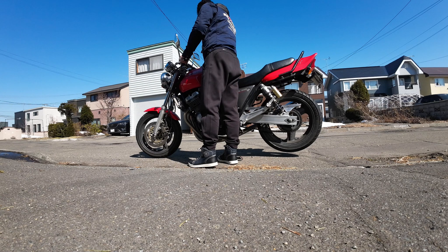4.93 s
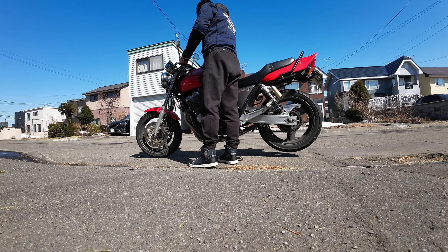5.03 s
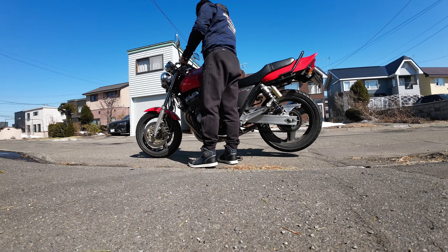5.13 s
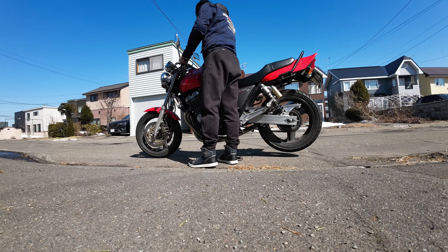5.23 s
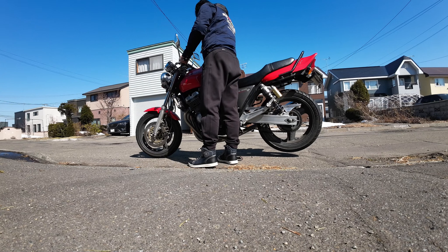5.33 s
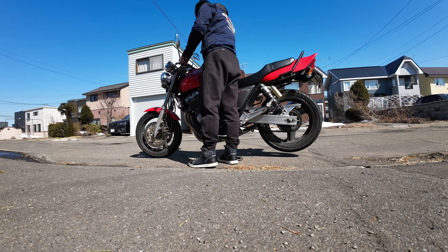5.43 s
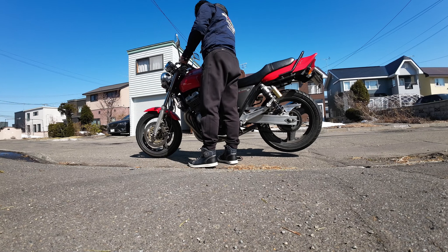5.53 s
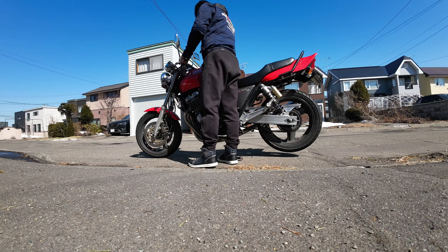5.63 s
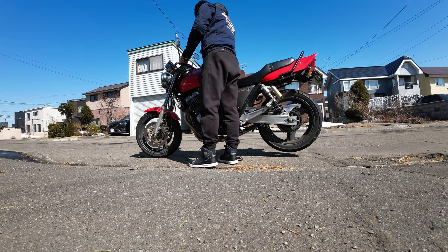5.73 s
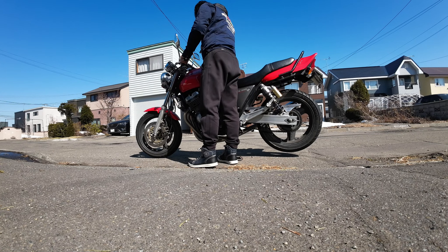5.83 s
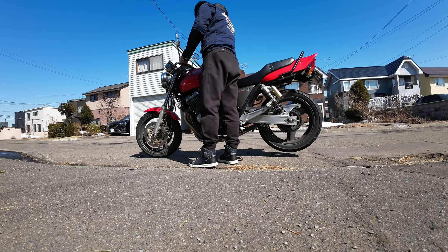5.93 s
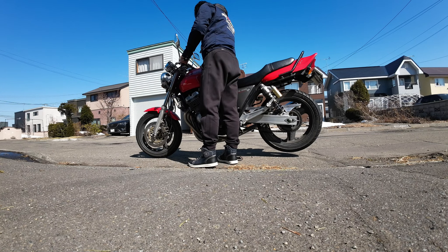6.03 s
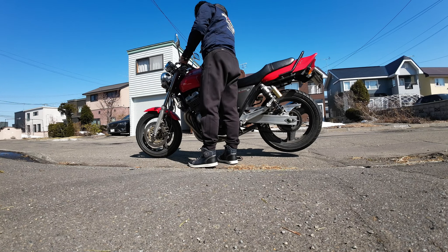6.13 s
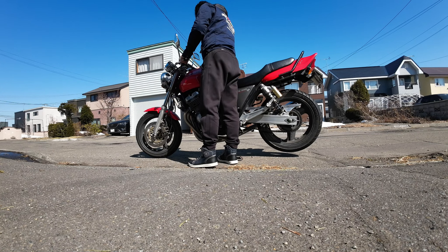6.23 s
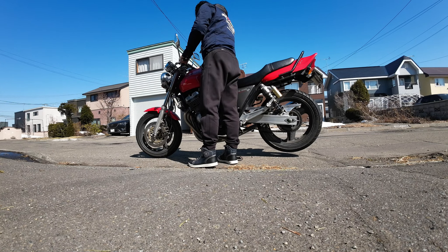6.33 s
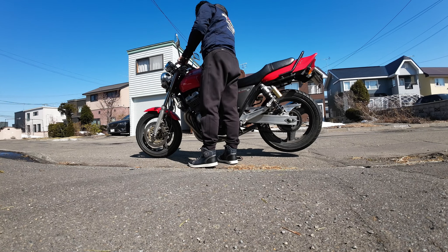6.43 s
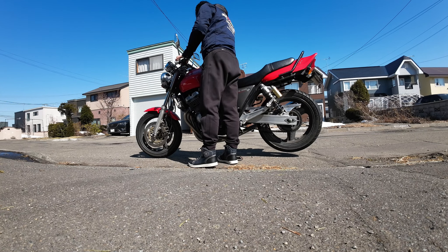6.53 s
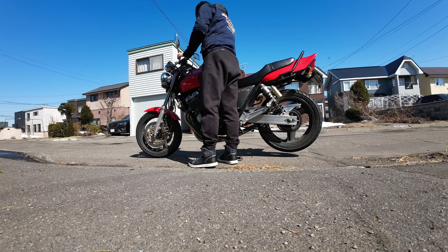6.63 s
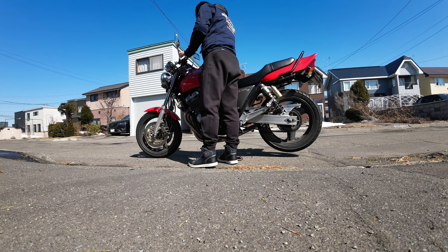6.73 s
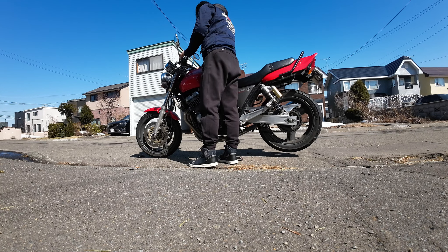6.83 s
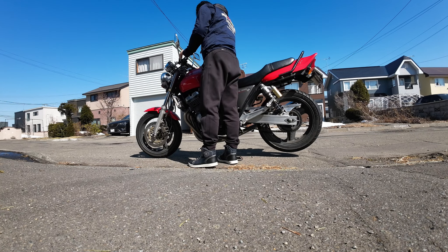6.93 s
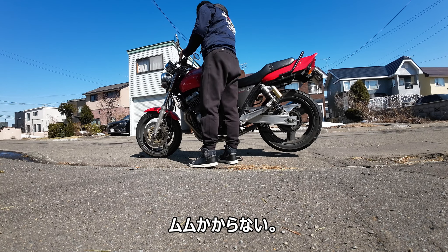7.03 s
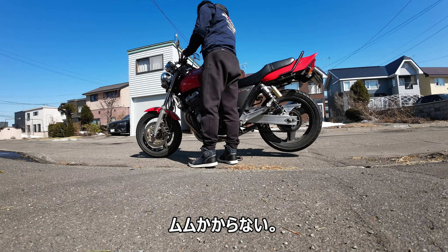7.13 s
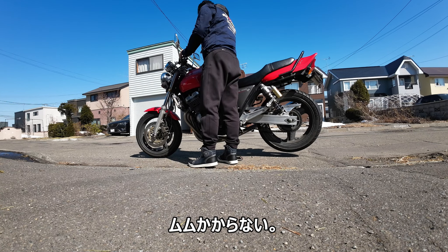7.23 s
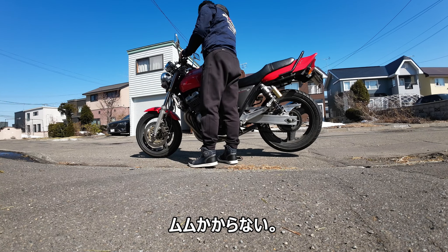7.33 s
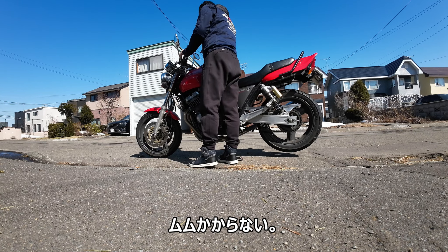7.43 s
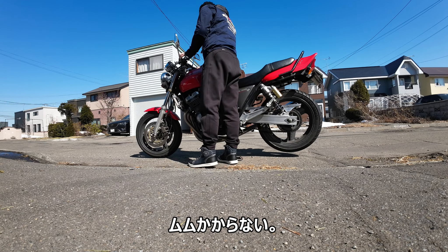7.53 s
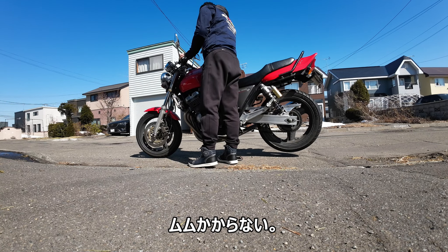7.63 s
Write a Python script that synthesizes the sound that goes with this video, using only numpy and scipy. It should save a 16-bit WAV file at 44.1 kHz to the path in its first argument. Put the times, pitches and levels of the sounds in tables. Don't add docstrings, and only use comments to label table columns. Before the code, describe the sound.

An electric starter is already cranking a cold motorcycle engine, its metallic whine sagging and scraping with each compression over low exhaust thumps. After about a second and a half it is released and coasts down. Following a short windy pause, a relay clunks and a longer burst cranks steadily, never firing, then slows to rest. Wind buffets the microphone, with a firm switch click and slight cloth rustle. Quiet open street, fairly close stereo pickup.

```python
import sys
import numpy as np
from scipy import signal
from scipy.fft import rfft, irfft, next_fast_len
from scipy.io import wavfile
from scipy.ndimage import uniform_filter1d

SR = 44100
rng = np.random.default_rng(int(sys.argv[2]) if len(sys.argv) > 2 else 0)


def transcribe(signal):
    frames = np.atleast_2d(signal).T
    limited = np.clip(frames, -1, 1)
    pcm = np.round(limited * 32767).astype(np.int16)
    wavfile.write(sys.argv[1], SR, pcm)


def elevation(decibels):
    levels = np.asarray(decibels, float)
    return 10 ** (levels / 20)


N = 339215


def evened(x):
    return x / np.sqrt(np.mean(x ** 2) + 1e-20)


def curve(rows):
    s, *columns = np.transpose(rows)
    return [np.interp(np.arange(N) / SR, s, c) for c in columns]


def colour(x, points):
    size = next_fast_len(N + 8192)
    f, db = np.transpose(points)
    log_hz = np.log(np.fft.rfftfreq(size, 1 / SR) + 1)
    gain = elevation(np.interp(log_hz, np.log(f + 1), db))
    return irfft(rfft(x, size) * gain, size)[..., :N]


def wobble(hz, size=()):
    noise = rng.standard_normal(size + (N,))
    width = int(SR / hz / 2)
    return evened(uniform_filter1d(uniform_filter1d(noise, width), width))


def ring(x, modes, direct_db):
    t = np.arange(16384) / SR
    body = np.zeros(len(t))
    for hz, width, db in modes:
        decay = np.exp(-np.pi * width * t)
        body += elevation(db) * 2 * np.pi * width / SR * decay * np.sin(2 * np.pi * hz * t)
    return elevation(direct_db) * x + signal.oaconvolve(x, body)[:N]


def add(mix, s, sound):
    part = mix[round(s * SR):][:len(sound)]
    part += sound[:len(part)]


# hz, level_db
STREET_HISS = [(180, -37.5), (300, -9.5), (343, 2), (903, -1.5), (1910, -19), (5470, -25.5), (8880, -34),
               (10200, -30.5), (12800, -47), (15200, -38), (16200, -53)]


def street():
    shared, *own = rng.standard_normal((3, N))
    hiss = evened(colour(shared + 0.42 * np.array(own), STREET_HISS))
    return elevation(-62.5 - 1.5 + wobble(3)) * hiss


# time_s, gust_db, flutter_over_rumble_db
WIND = [(0, -59.5, -16), (1.45, -46, -12), (1.5, -44, -16), (1.75, -50.5, -8), (1.93, -46, -12),
        (2.082, -45, -11), (2.19, -52, -9.5), (2.55, -60.5, -21), (5.9, -55.5, -31), (5.97, -43.5, -8),
        (6.172, -48, -7), (6.404, -38.5, -13), (6.536, -44.5, -9), (6.58, -39.5, 0.5), (7.326, -45.5, 1),
        (7.354, -38.5, -3.5), (7.69, -49.5, -4.5)]
# hz, level_db_per_hz
RUMBLE = [(8.8, -34), (15, -6), (59, 5.5), (130, -21.5), (170, -45.5), (290, -120)]
# hz, level_db_per_hz
FLUTTER = [(59, -25.5), (100, 8), (145, 2.5), (247, -5), (426, -22.5), (590, -39.5), (700, -30),
           (910, -55.5), (1540, -120)]


def wind():
    gust_db, flutter_db = curve(WIND)
    pan_db = np.array([[0.25], [-0.25]])
    lumps = elevation(2.8 * wobble(25, (2,)))
    rumble = evened(colour(rng.standard_normal((2, N)), RUMBLE))
    flutter = evened(lumps * colour(rng.standard_normal((2, N)) * lumps, FLUTTER))
    return elevation(gust_db + 5.0 + pan_db) * (rumble + elevation(flutter_db) * flutter)


# time_s, peak_pressure, pitch_hz
EDDIES = [
    [(2.045, -0.042, 50), (2.128, -0.1, 148), (6.584, 0.084, 80), (6.613, 0.11, 100.4), (6.813, -0.072, 119.4), (6.839, -0.022, 79.8), (6.91, 0.12, 119.5), (6.937, 0.041, 90), (6.985, -0.079, 297), (7.026, 0.1, 110), (7.095, 0.11, 90), (7.367, -0.13, 151.4), (7.533, 0.1, 151.7), (7.435, -0.062, 200), (7.655, 0.065, 101)],
    [(2.034, -0.042, 50), (2.121, -0.045, 100), (6.362, -0.063, 115), (6.417, -0.091, 110), (6.573, -0.039, 119.7), (6.629, 0.026, 60.3), (6.715, -0.085, 99), (6.74, 0.053, 59.7), (6.826, -0.052, 69), (6.939, -0.084, 200), (6.98, -0.064, 146), (7.022, 0.086, 183), (7.342, 0.082, 148.3), (6.268, -.04, 70), (7.6, 0.019, 150)],
]


def wind_pops():
    out, t = np.zeros((2, N)), np.arange(-.03, .03, 1 / SR)
    for port, rows in zip(out, EDDIES):
        for s, peak, hz in rows:
            push = np.exp(-abs(2.1 * hz * t) ** 1.05)
            add(port, s + t[0], peak * np.cos(2 * np.pi * hz * t) * push)
    return out


# first_bite_s, second_cylinder_grip_s
CYCLES = [(-.119, 0.03), (.231, 0.028), (.582, 0.028), (.931, 0.029), (1.283, 0.037), (2.59, .039),
          (2.943, 0.042), (3.296, 0.036), (3.646, 0.039), (3.995, 0.043), (4.346, .039), (4.696, 0.043),
          (5.046, 0.04), (5.395, 0.039), (5.744, 0.034)]
LOAD_DB = (-25.5, -26.5, -26, -24.5)
# on_s, off_s
CRANKING = [
    (.03, 1.45),
    (2.65, 5.85),
]
SECOND_BITE_S = .082


def strokes():
    rows = []
    for s, grip in CYCLES:
        second_go = SECOND_BITE_S + grip
        spans = [(0, .039), (SECOND_BITE_S, second_go), (second_go + .012, .207), (.222, .302)]
        rows += [(k, s + bite, s + go, LOAD_DB[k]) for k, (bite, go) in enumerate(spans)]
    return [[row for row in rows if row[2] > on and row[1] < off] for on, off in CRANKING]


# time_s, level_db, pitch_hz
CLUNKS = [
    (1.453, -28.5, 270),
    (2.444, -36, 291),
    (5.837, -28, 287),
]
# time_s, level_db, pitch_hz
BUTTON = [
    (2.419, -62, 5000),
    (6.501, -51, 1500),
    (7.106, -48, 3000),
    (7.263, -26, 2500),
]
# time_s, level_db
TICKS = [
    (2.4427, -13.5),
    (6.3906, -72),
    (6.6947, -53),
    (6.798, -56),
    (7.0135, -62),
    (7.1063, -39.5),
    (7.3044, -65),
    (7.3998, -69.5),
    (7.5978, -62),
]
# time_s, level_db, half_width_s
RUSTLES = [
    (7.233, -61, 0.037),
    (7.465, -74, .025),
]
# hz, level_db_per_hz
SLEEVE = [(350, -30), (600, 5), (970, -16), (1110, -14), (7110, -16.5), (8620, -29), (9760, -16),
          (16000, -37.5)]


def small_sounds():
    out, t = np.zeros(N), np.arange(2600) / SR
    for s, db, hz in CLUNKS:
        add(out, s, elevation(db - 60 * t / 0.068) * np.sin(2 * np.pi * hz * t))
    chirp_s = .016
    chirp_t = np.arange(0, chirp_s, 1 / SR)
    chirp = np.sin(2 * np.pi * 11100 * chirp_t) * np.hanning(len(chirp_t)) ** .5
    for s, _ in CYCLES[1:]:
        add(out, s + SECOND_BITE_S - chirp_s, elevation(-46 + 3.5 * rng.standard_normal()) * chirp)
    for s, db, hz in BUTTON + [(s, db, 5600) for s, db in TICKS]:
        band = signal.butter(3, [hz / 2.2, min(2.1 * hz, .45 * SR)], "bandpass", fs=SR)
        click = evened(signal.lfilter(*band, rng.standard_normal(len(t))))
        add(out, s, elevation(db - 60 * t / .008) * click / 2)
    time = np.arange(N) / SR
    rustle = sum(elevation(db) * np.exp(-((time - s) / half) ** 4) for s, db, half in RUSTLES)
    return out + rustle * elevation(2.2 * wobble(200)) * evened(colour(rng.standard_normal(N), SLEEVE))


# pitch_hz, level_db, t60_s
PIPE = [(74.8, -3, 0.25), (33, -5.5, .2), (95.5, -24, 0.72)]
# share_of_stroke, lag_s, level_db
THUMPS = [
    (0, 0.0094, -31.5),
    (0, 0.019, -32),
    (1, -.013, -28),
    (1, -0.017, -30),
]
# time_s, level_db
ODD_THUMPS = [
    (1.61, -36),
    (1.72, -40),
    (2.606, -32),
    (5.965, -34),
    (6.005, -48),
]


def exhaust():
    out, t = np.zeros(N), np.arange(-.012, .25, 1 / SR)
    thumps = list(ODD_THUMPS)
    for burst in strokes():
        for k, bite, go, _ in burst:
            share, lag, db = THUMPS[k]
            thumps.append((bite + share * (go - bite) + lag, db))
    rise = np.clip(t / 0.01 + 1, 0, 1) ** 0.57
    for s, db in thumps:
        rings = np.zeros(len(t))
        for hz, rel, t60 in PIPE:
            detune = 1 + 0.01 * rng.standard_normal()
            rings += elevation(rel - 60 * np.maximum(t, 0) / t60) * np.cos(2 * np.pi * hz * detune * t)
        add(out, s + t[0], elevation(db + rng.standard_normal()) * rise * rings)
    return out


# share_of_stroke, tooth_rate_hz, load_db, whine_over_load_db
CYLINDERS = [
    [(0, 1488, -1, -24), (.15, 1470, 3.5, -6), (.45, 1388, 1.5, 1), (.8, 1354, 0.5, -10), (1, 1321, -8, 4)],
    [(0, 1508, -2.5, -21), (.2, 1478, 5.5, -12), (.45, 1400, -1, 3.5), (.7, 1432, 1, -9.5),
     (1, 1427, -2.5, 1)],
    [(0, 1473, -5.5, -6.5), (.15, 1460, 2, -8), (.3, 1427, -3, -9.5), (.45, 1439, 2, -7),
     (.6, 1402, -0.5, 2.5), (.85, 1381, 1, -5), (1, 1398, -3, 1)],
    [(0, 1453, -7.5, -12), (.15, 1413, 1, -5.5), (.35, 1434, -2.5, -2), (.55, 1387, -1, 1.5),
     (.7, 1339, -0.5, -4), (.8, 1274, 1, -1), (1, 1245, -4, 0.5)],
]
# early_db, late_db, whine_over_load_db
SLACK = [
    (-17, -27.5, -7.5),
    (-11.5, -16.5, -4),
    (-12.5, -17, -0.5),
    (-20.5, -22, -1.5),
]


def stroke_rows(burst):
    rows = []
    for (k, bite, go, db), after in zip(burst, burst[1:] + [None]):
        steps = CYLINDERS[k]
        for share, hz, rel, whine in steps:
            rows.append((bite + share * (go - bite), hz, db + rel, whine))
        if after:
            early_db, late_db, whine = SLACK[k]
            gap = after[1] - go
            die_away, take_up = min(.013, gap / 3), min(.005, gap / 2)
            rows.append((go + die_away, steps[-1][1], db + early_db, whine))
            rows.append((go + gap - take_up, 1517, db + late_db, whine))
    return rows


# time_s, tooth_rate_hz, load_db, whine_over_load_db
SPIN_UP = [
    (2.44, 205.5, -83, 11.5),
    (2.445, 300.5, -42, -21),
    (2.46, 506, -39.5, -3.5),
    (2.515, 1002, -27.5, -15.5),
    (2.528, 1113, -37, -2),
    (2.54, 1202, -27.5, -2.5),
    (2.585, 1236, -25.5, 4.5),
    (2.623, 1192, -27.5, -3.5),
    (2.64, 1169, -50, 4),
]
# bite_s, length_s, load_db, fade_db
COAST_STROKES = [
    [(1.521, .15, -28, -41.5), (1.705, .16, -63, -26)],
    [(5.892, 0.096, -27.5, -8), (6.018, 0.14, -35.5, -42)],
]


def coast_rows(coast, bites):
    start, top_hz, slowing, whine = coast
    rest_hz, rest_db = 200, -135
    rows = []
    for bite, length, db, fade_db in bites:
        rows.append((bite - .01, db - 23.5, whine))
        for t in np.arange(0, length, .003):
            fade = fade_db * (t / length) ** 2.66
            rattle = 1.3 * np.cos(2 * np.pi * 34.5 * t)
            rows.append((bite + t, db + fade + rattle, whine - 0.32 * fade))
    rows.append((rows[-1][0] + .3, rest_db, 0))
    first_coast = start < SPIN_UP[0][0]
    rows.append((SPIN_UP[0][0] - .002 if first_coast else N / SR, rest_db, 0))
    speed = rest_hz, top_hz - rest_hz
    return [(s, speed[0] + speed[1] * np.exp((start - s) / slowing), db, w) for s, db, w in rows]


# let_go_s, tooth_rate_hz, slowing_s, whine_over_load_db
COASTS = [
    (1.5, 1200, .128, 0),
    (5.86, 1230, .19, -5),
]
# time_s, share_of_speed
POWER_CUT = [
    (1.455, 1),
    (1.478, .89),
    (1.49, .89),
    (1.5, 1),
]
# tooth_rate_hz, gain_db
RADIATES = [(450, -34), (600, 2), (690, -22), (810, 3), (930, -22), (1150, -6), (1200, 0), (1500, 0)]
# multiple_of_tooth_rate, level_db
ORDERS = [(2, 1.5), (3, -1.5), (4, -1.5), (5, 6), (6, 6.5), (7, 0), (8, -0.5), (9, -2), (10, -9), (11, -16)]
# hz, gain_db
WALLS = [(2000, 3), (4600, -5), (5200, -7), (6400, -15.5), (6800, 3.5), (10400, 5.5), (11000, -5),
         (14000, -9.5)]
# hz, level_db_per_hz
GRIT = [(240, -48), (400, -39.5), (589, -9.5), (709, -24), (982, -22), (1400, -3), (1610, -9), (2900, -7.5),
        (5150, -7), (8320, -2), (9280, -13), (10000, -7), (12500, -15), (14100, -24.5), (16200, -35.5)]
# pitch_hz, width_hz, gain_db
CASE = [(2530, 20, 5), (2759, 36, 4.5), (3070, 45, 8), (3540, 270, 0), (3736, 52, 4.5), (4833, 120, 1),
        (6700, 30, -20), (6707, 130, -3), (6970, 53, 0.5), (7950, 120, -9), (8252, 190, 0.5),
        (8700, 58, -3.5), (9750, 180, -3.5), (10150, 52, -4.5), (11800, 80, -2), (12200, 160, -7),
        (15720, 260, 19), (4500, 300, -3)]
# hz, level_db_per_hz
WHIR = [(110, -28), (180, -12.5), (375, -3.5), (1320, 11), (1930, 1), (3530, 3), (5330, -14), (6810, -12.5),
        (7920, -39), (11500, -27), (13900, -42.5), (15300, -29.5), (16200, -39)]
# pitch_hz, width_hz, gain_db
BLOCK = [(625, 54, 4.5), (811.6, 34, 1), (913, 38, -3), (1260, 58, -1.5), (265, 19, 1.5), (364, 30, 1)]
# pitch_hz, width_hz, gain_db
COVERS = [(2780, 8, 2), (3480, 8, 1)]
# time_s, level_db
HUM = [
    (0, -49.5),
    (1.47, -48.5),
    (1.52, -91),
    (2.6, -87.5),
    (2.67, -48.5),
    (5.84, -48),
    (5.9, -72),
]


def starter():
    rows = list(SPIN_UP)
    for burst, coast, bites in zip(strokes(), COASTS, COAST_STROKES):
        rows += stroke_rows(burst) + coast_rows(coast, bites)
    hz, load_db, whine_db = curve(sorted(map(tuple, rows)))
    hz = hz * curve(POWER_CUT)[0] * (1 + .005 * wobble(8))
    load = elevation(load_db)
    driven = np.clip((hz - 1050) / 120, 0, 1) * np.clip((load_db + 42) / 10, .15, 1)
    flutter = .004 + .025 * (1 - driven)
    turns = 2 * np.pi * np.cumsum(hz * (1 + flutter * wobble(90))) / SR
    shaft = turns / 9

    uneven = 1 + .25 * np.cos(shaft) + .3 * wobble(60)
    whine_level = uneven * elevation(load_db + whine_db + np.interp(hz, *np.transpose(RADIATES)))
    whine = np.sqrt(2) * np.cos(turns + .22 * wobble(160)) * whine_level
    whine += .4 * (1 - driven) * np.cos(2 * turns) * whine_level

    orders = np.zeros(N)
    for (k, db), wear in zip(ORDERS, wobble(120, (len(ORDERS),))):
        phase = round(k) * turns + k ** 2 + .4 * wear + .3 * np.sin(shaft + k)
        orders += elevation(db) * (1 + .7 * wear) * np.cos(phase)
    grains = rng.standard_normal(N) * elevation(0.73 * wobble(300) + 2. * np.cos(turns))
    mesh = elevation(-3) * driven * evened(colour(orders, WALLS))
    scrape = elevation(-6 + 3 * (1 - driven)) * evened(colour(grains, GRIT))
    teeth = load * (mesh + scrape)
    dull = uniform_filter1d(teeth, size=3)
    fast = np.clip((hz - 500) / 500, 0, 1)
    case = elevation(4) * ring(fast * teeth + (1 - fast) * dull, CASE, -3.5)

    t = np.arange(N) / SR
    powered = (t < COASTS[0][0]) | ((t > SPIN_UP[1][0]) & (t < COASTS[1][0]))
    coasting_db = -29.5 + 0.53 * (load_db + 31)
    whir_db = uniform_filter1d(np.where(powered, -33, coasting_db), size=300)
    whir = elevation(whir_db + 2.53 * wobble(34)) * evened(colour(rng.standard_normal(N), WHIR))
    knock = elevation(-20.5) * load * evened(ring(grains, BLOCK, -58.5))
    shaft_slow = 2 * np.pi * np.cumsum(uniform_filter1d(hz, 1500) / 9) / SR
    hum = elevation(curve(HUM)[0]) * np.sqrt(2) * np.cos(shaft_slow) * (1 + 0.24 * wobble(36))
    return whine + case + ring(whir, BLOCK + COVERS, -3.5) + knock + hum


# hz, level_db
APART = [(200, -40), (600, -33), (1400, -24), (3000, -24), (5000, -7), (8000, -8.5), (12000, -5),
         (16000, -10)]
# hz, gain_db
LEADS = [(1500, -1), (4400, -3.5), (5400, 3.5), (8000, 1.5), (11500, -1), (12300, -20)]


def spread(x):
    t = np.arange(9000) / SR
    far = rng.standard_normal((2, len(t))) * elevation(-60 * t / 0.61) * (t > .015)
    houses = signal.oaconvolve(x[None], far / np.linalg.norm(far[0]), axes=1)[:, :N]
    unlike = colour(x, APART) * wobble(30)
    lead_s = .000013
    slope = colour(np.gradient(x), LEADS) * SR * lead_s / 2
    return x + np.outer([1, -1], slope + unlike) + elevation(-31) * houses


def scene():
    motorcycle = starter() + exhaust() + small_sounds()
    return street() + wind() + wind_pops() + spread(motorcycle)


def low_pass(x):
    return signal.sosfilt(signal.butter(12, 16820, fs=SR, output="sos"), x)


def record(dry):
    edge = signal.firwin(1023, 15790, window=("kaiser", 9), fs=SR)
    overloaded = 0.59 * np.tanh(dry / 0.61)
    mix = signal.oaconvolve(overloaded, edge[None], "same", axes=1)
    return low_pass(mix)


dry = scene()
out = record(dry)
transcribe(out)
```